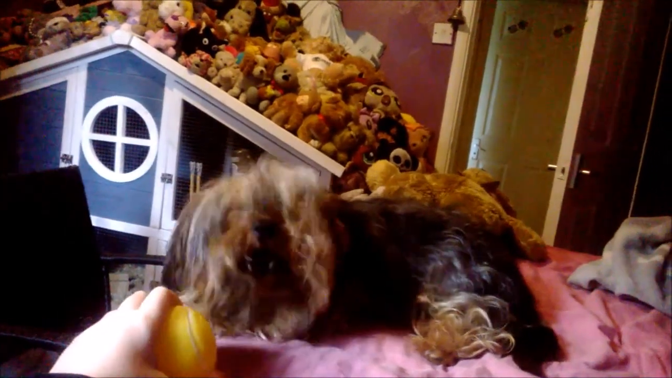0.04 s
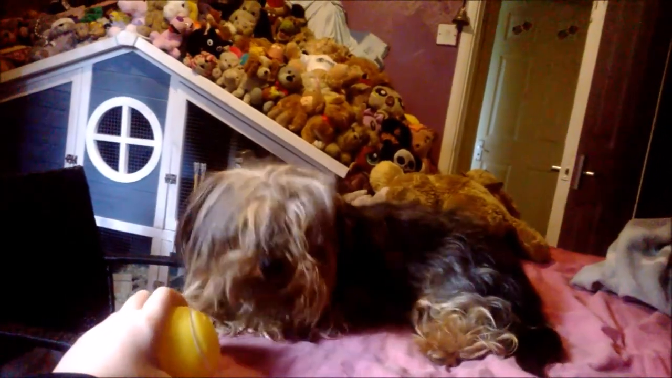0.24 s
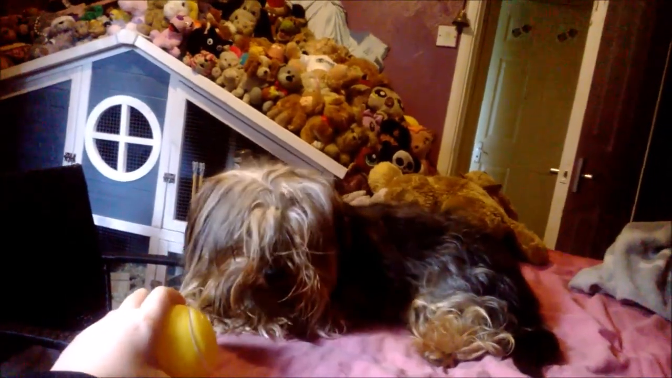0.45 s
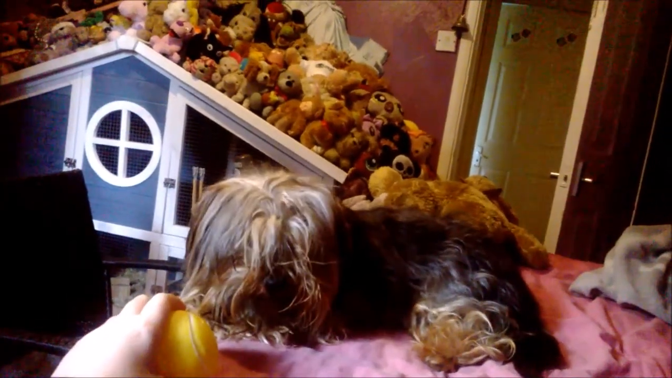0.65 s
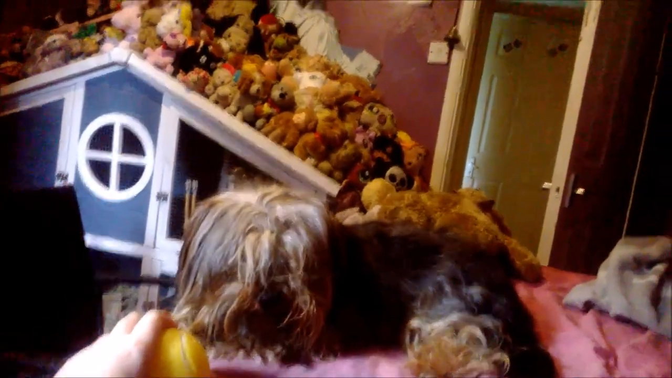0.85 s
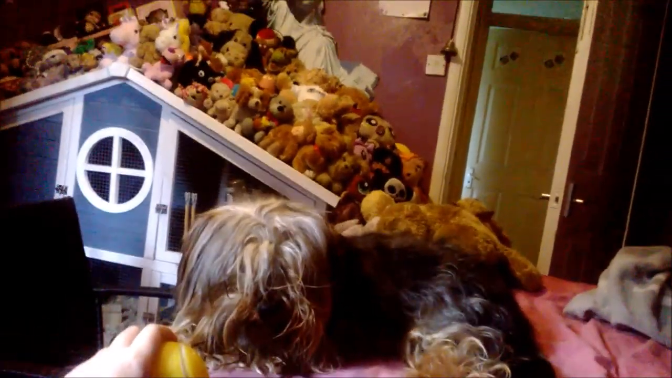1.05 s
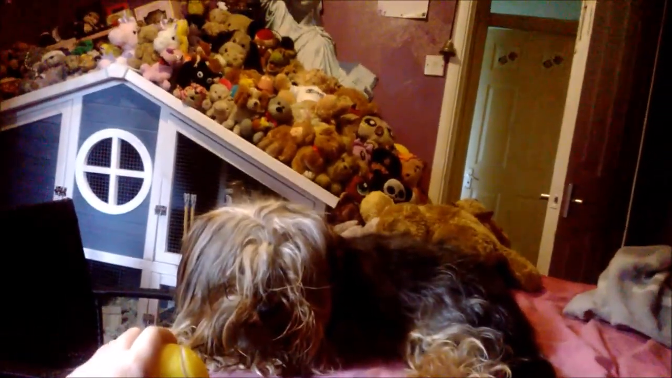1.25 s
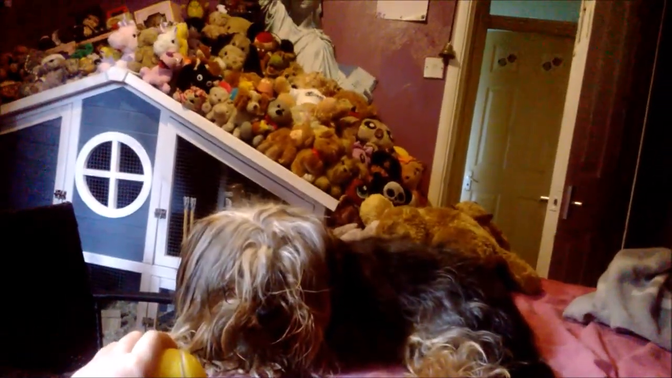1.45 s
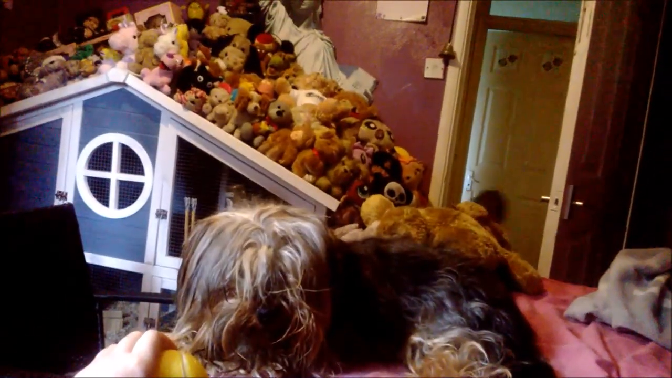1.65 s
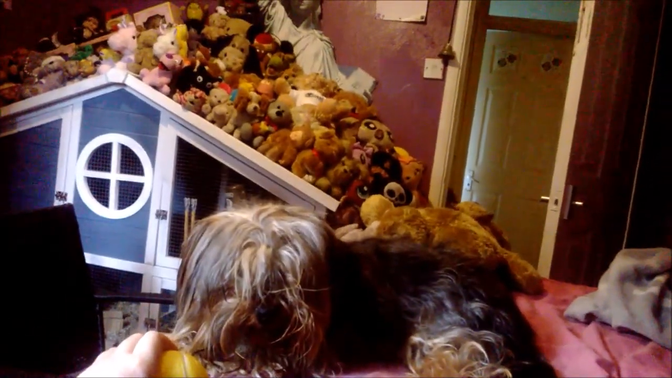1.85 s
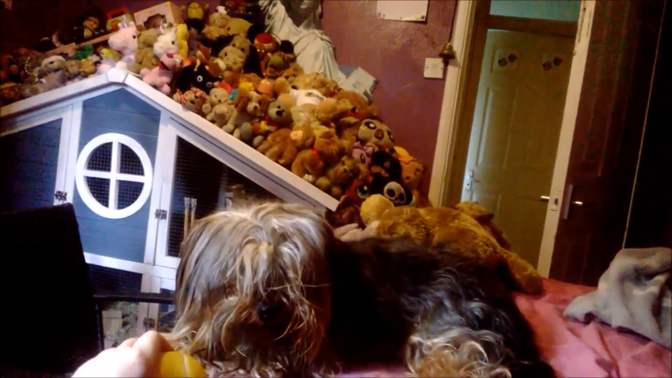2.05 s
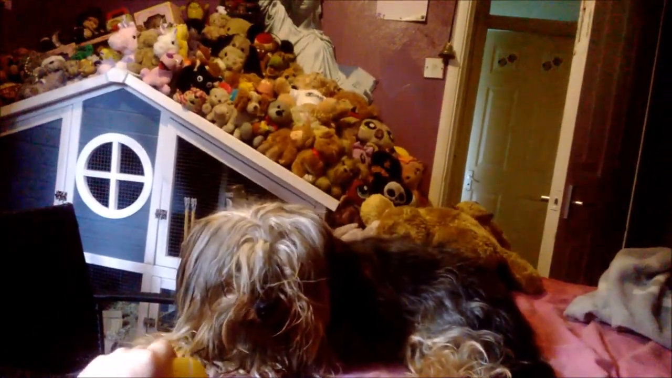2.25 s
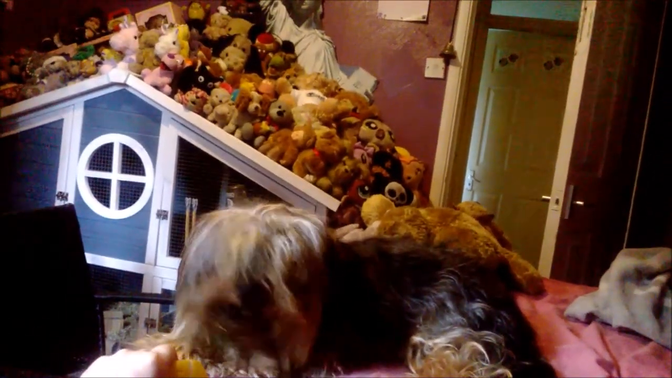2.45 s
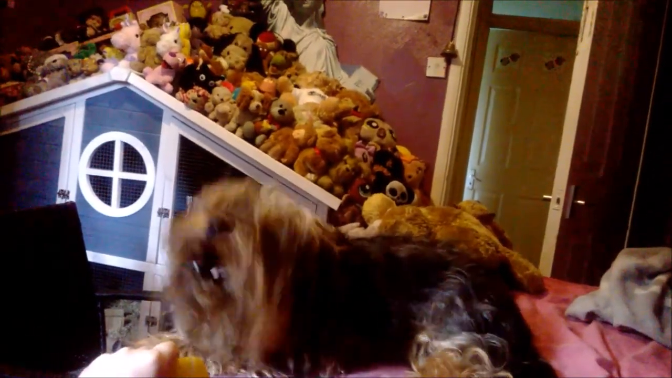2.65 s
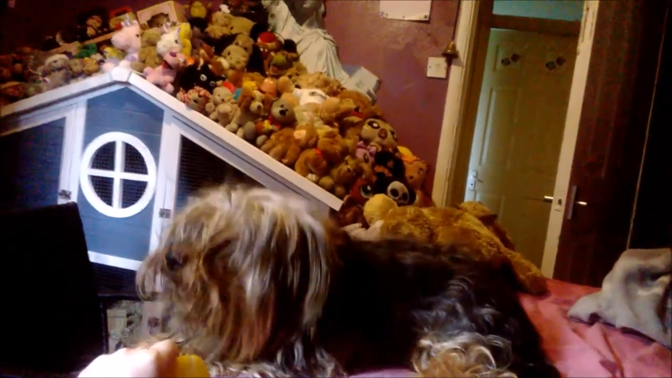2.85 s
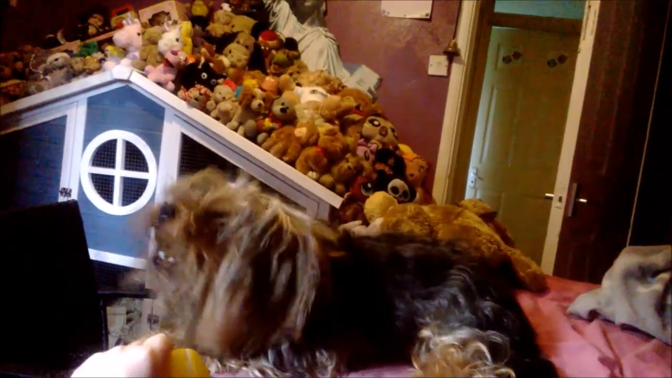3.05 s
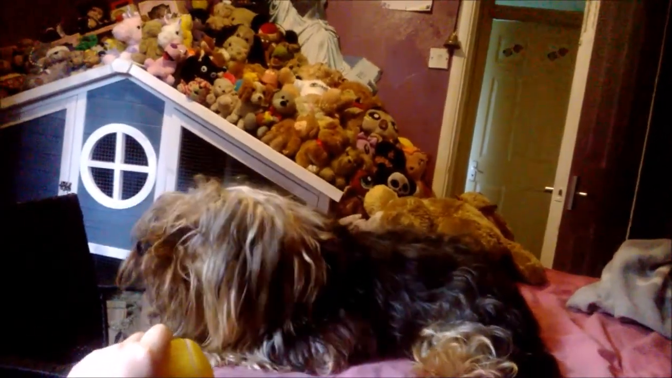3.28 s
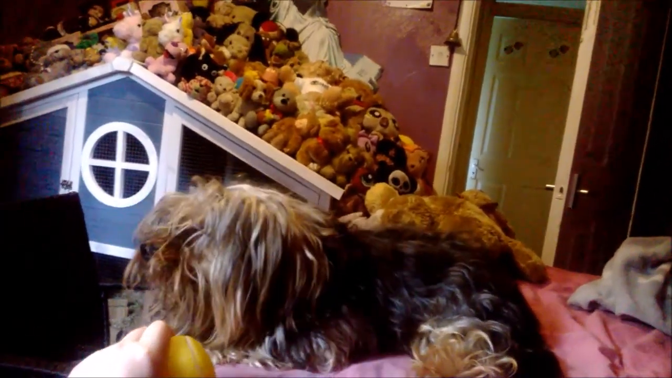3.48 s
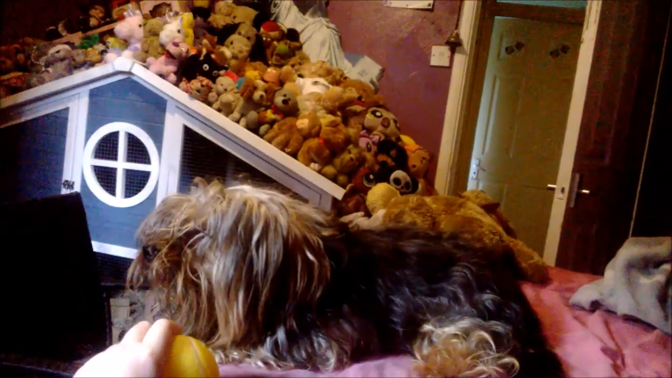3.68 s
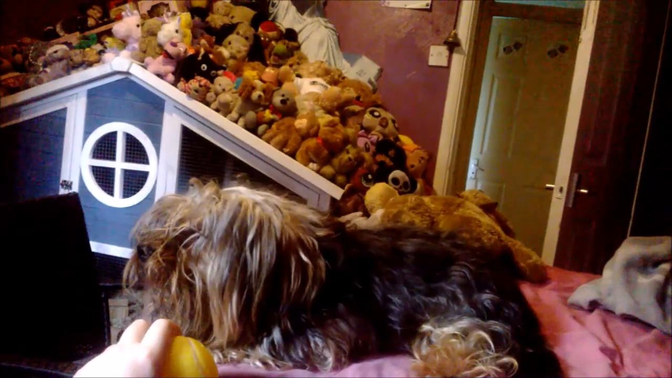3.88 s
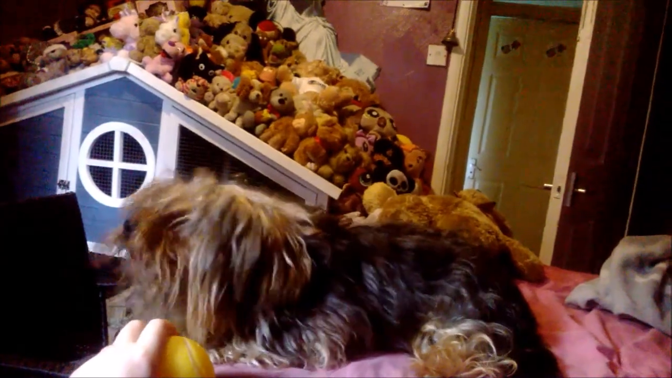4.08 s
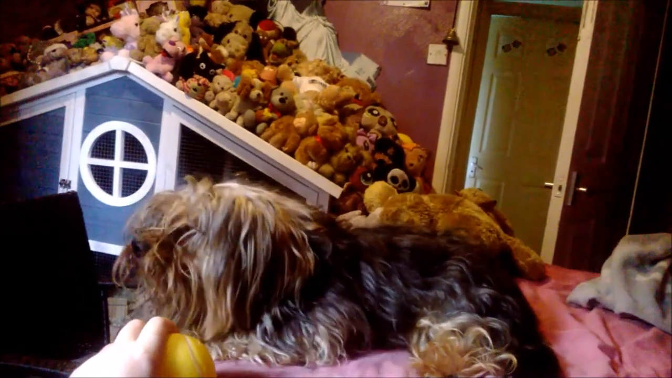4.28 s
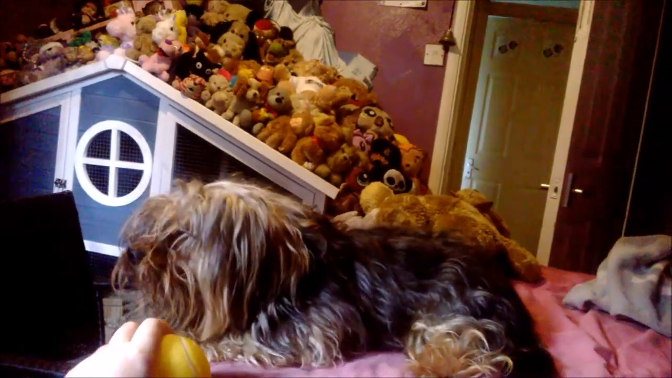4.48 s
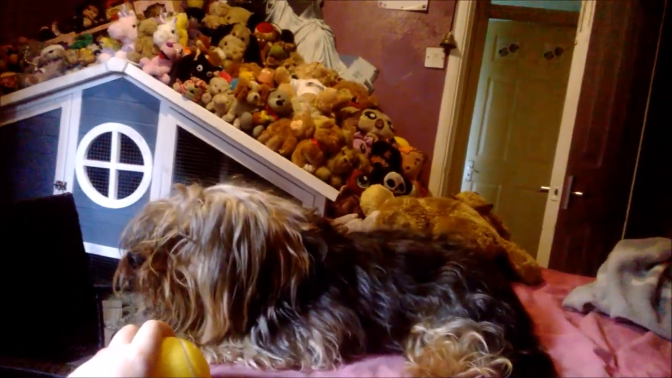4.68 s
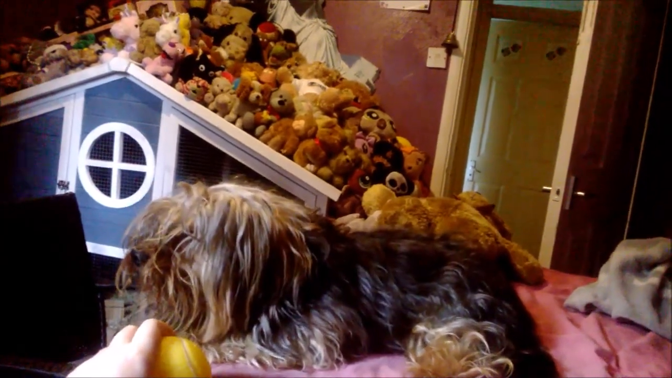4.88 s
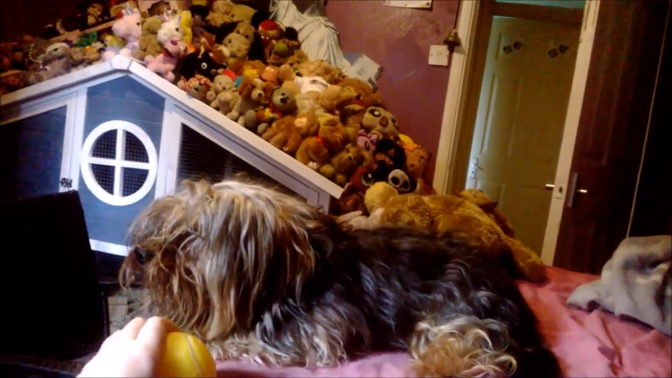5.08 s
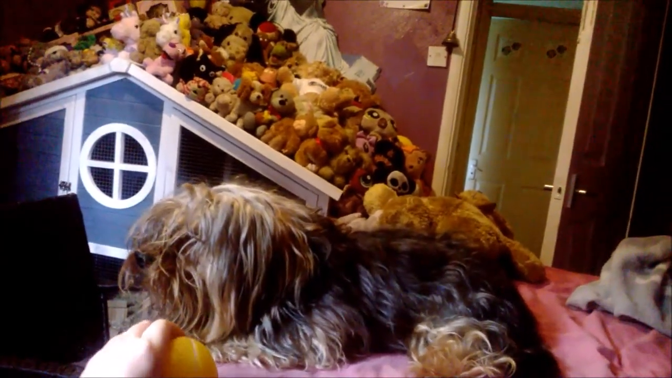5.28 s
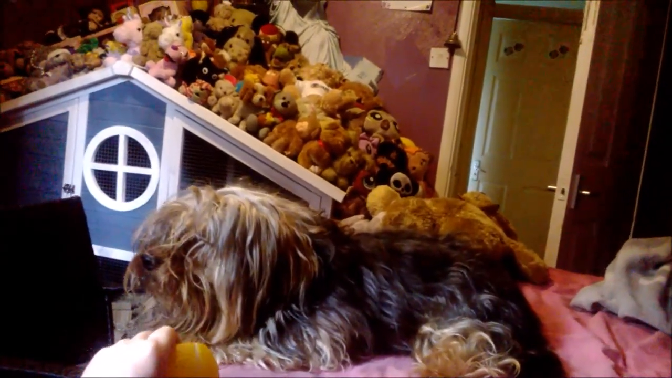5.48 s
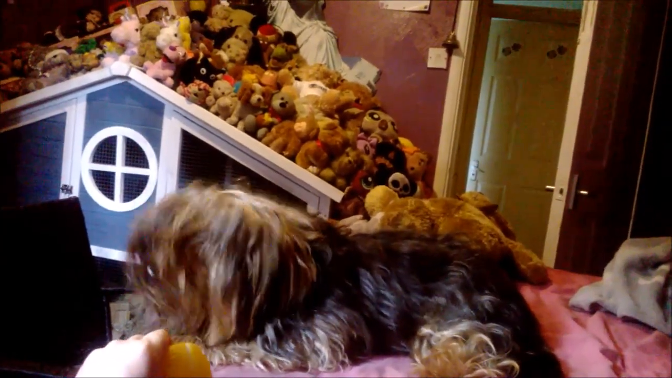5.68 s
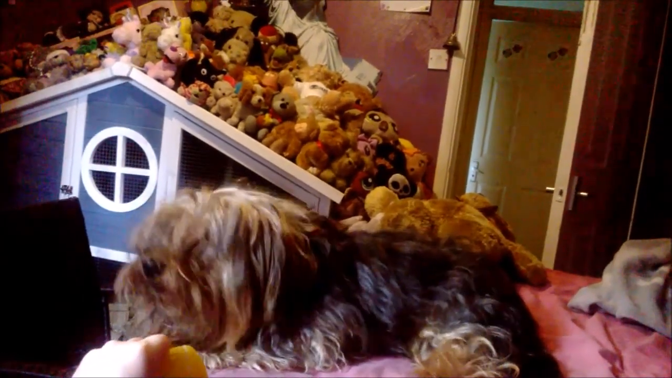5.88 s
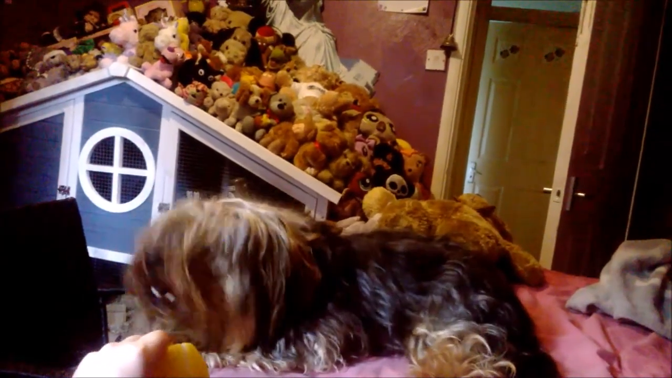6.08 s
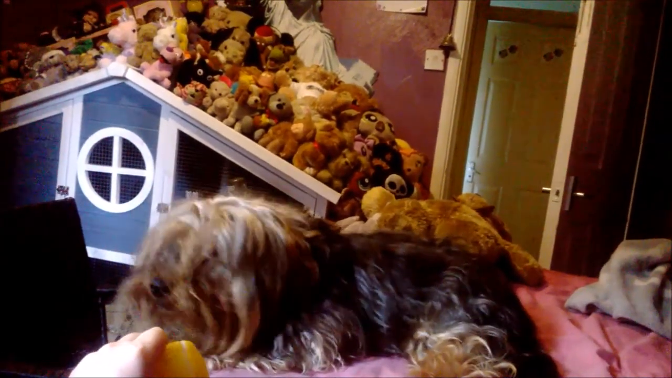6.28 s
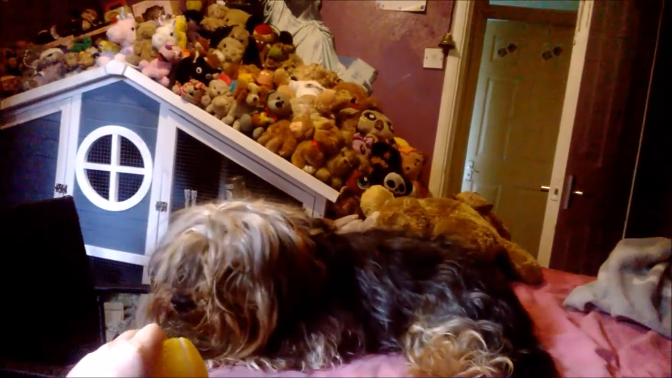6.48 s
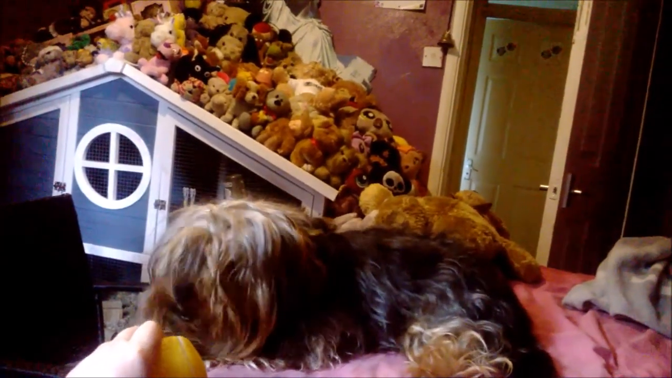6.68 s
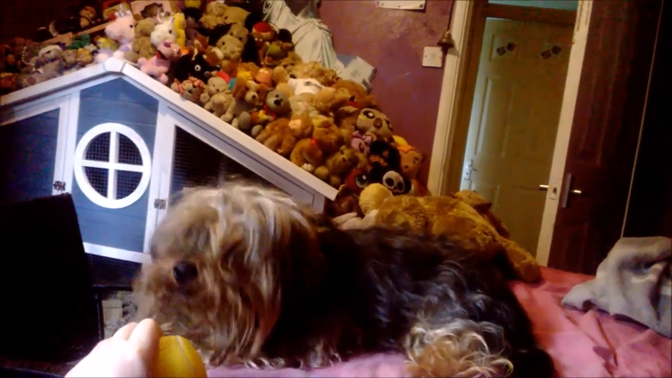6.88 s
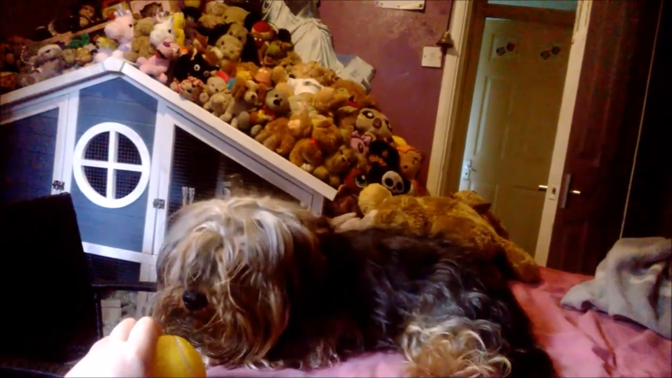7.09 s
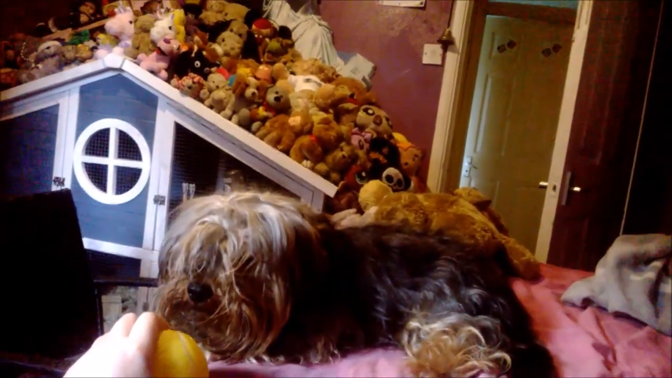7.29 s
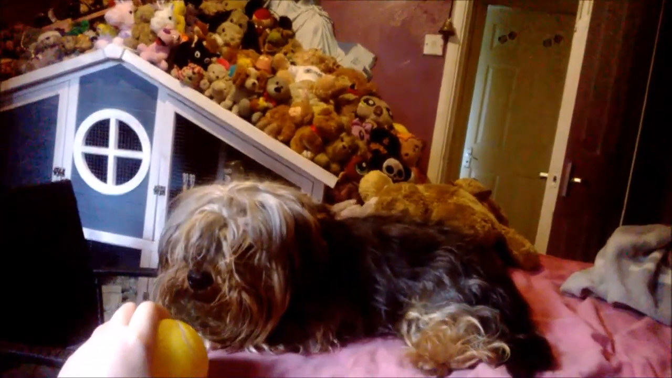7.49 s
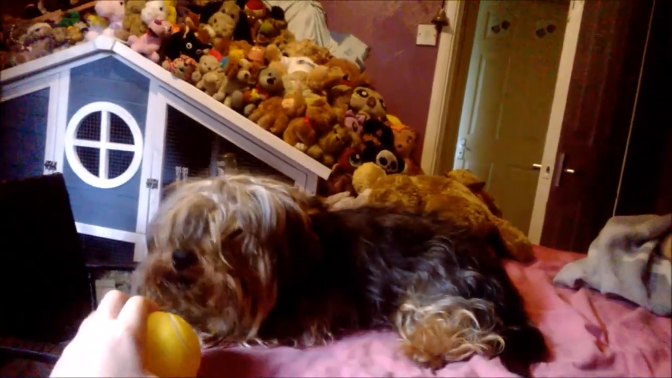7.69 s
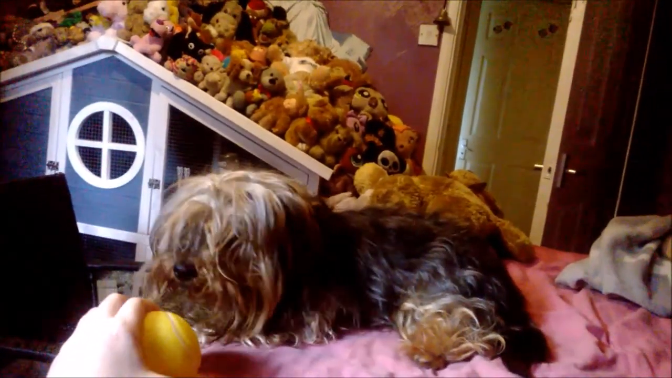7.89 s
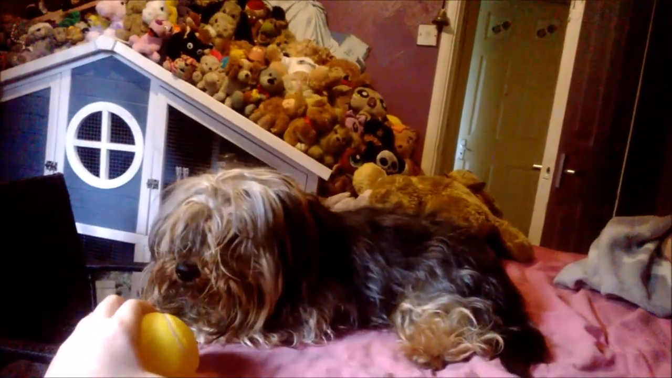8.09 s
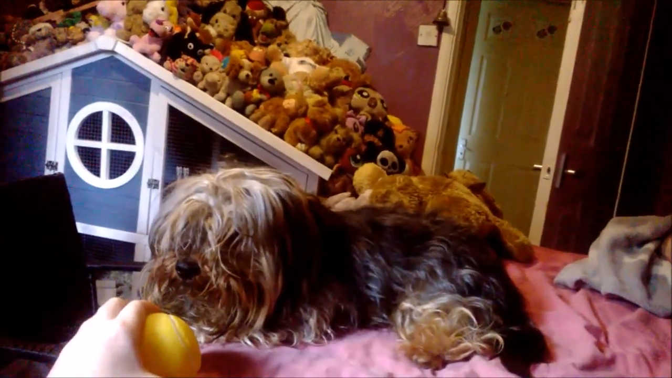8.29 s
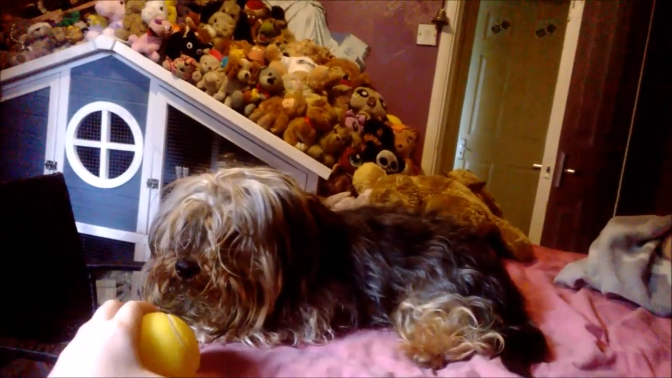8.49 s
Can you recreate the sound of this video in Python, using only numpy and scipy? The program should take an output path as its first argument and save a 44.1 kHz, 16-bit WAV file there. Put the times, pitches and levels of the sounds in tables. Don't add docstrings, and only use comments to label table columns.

```python
import sys
import numpy as np
from scipy import signal
from scipy.fft import rfft, irfft
from scipy.io import wavfile
from scipy.ndimage import uniform_filter1d, minimum_filter1d

SR = 44100
rng = np.random.default_rng(int(sys.argv[2]) if len(sys.argv) > 2 else 0)


def materialize(psi):
    bounded = np.clip(np.atleast_2d(psi).T, -1, 1)
    quanta = np.round(bounded * 32767).astype(np.int16)
    wavfile.write(sys.argv[1], SR, quanta)


def voltage_ratio(decibels):
    exponent = np.asarray(decibels, float) / 20
    return 10 ** exponent


N = 376613


def evened(x):
    return x / np.sqrt(np.mean(x ** 2) + 1e-20)


def read(points, hz):
    f, value = np.transpose(points)
    return np.interp(np.log(hz + 1), np.log(f + 1), value)


def add(mix, s, sound):
    part = mix[round(s * SR):][:len(sound)]
    part += sound[:len(part)]


def controls(rows):
    s, *columns = np.transpose(rows)
    t = np.arange(s[0], s[-1], 1 / SR)
    return s[0], [np.interp(t, s, c) for c in columns]


def coloured(points, size):
    spectrum = rfft(rng.standard_normal(size))
    gain = voltage_ratio(read(points, np.fft.rfftfreq(size, 1 / SR)))
    return evened(irfft(spectrum * gain, size))


def wobble(size, smooth_s):
    span = max(int(smooth_s * SR), 2)
    noise = rng.standard_normal(N // 8)
    slow = evened(uniform_filter1d(uniform_filter1d(noise, span), span))
    return slow[np.arange(size) % (N // 8)]


def resonate(x, hz, width):
    turn = np.exp(2j * np.pi * np.cumsum(hz * np.ones(len(x))) / SR)
    r = np.exp(-np.pi * width / SR)
    return 2 * (turn * signal.lfilter([1 - r], [1, -r], x / turn)).real


# (frequency [Hz], density [dB per Hz])
AIR_NOISE = [(59, -46), (100, 6), (162, -16), (218, -4.5), (438, -23), (1040, -9), (1660, -12),
             (5870, -22.5), (15500, -27)]


def hiss():
    return voltage_ratio(-78) * coloured(AIR_NOISE, N)


# (time [s], level [dB])
STIRRING_LEVEL = [(0, -72), (6.8, -71), (7.0, -76.5), (8.54, -80)]
# (time [s], peak level [dB])
MATTRESS_JOLTS = [(0, -51.5), (.43, -60), (.71, -52), (.96, -42.5), (1.21, -48), (1.501, -38),
                  (1.74, -41.5), (2.369, -35.5), (2.709, -42.5), (2.96, -37), (3.23, -46), (3.46, -36.5),
                  (3.64, -59), (3.83, -58), (4.1, -56.5), (4.6, -53.5), (4.755, -42), (4.95, -59.5),
                  (5.215, -43), (5.77, -37.5), (6.0, -41), (6.26, -57), (6.47, -55), (6.89, -61),
                  (7.71, -73)]
# (frequency [Hz], density [dB per Hz])
SHAKING_SPECTRUM = [(15, -11), (30, -6), (50, -4.5), (90, -5), (130, -16.5), (200, -23), (300, -28),
                    (600, -39.5), (1200, -62.5)]


def rumble():
    rise_db_per_s, fall_db_per_s = 321.5, 150.5
    t = np.arange(N) / SR
    level = voltage_ratio(np.interp(t, *np.transpose(STIRRING_LEVEL)))
    for s, peak_db in MATTRESS_JOLTS:
        slope_db = np.minimum(rise_db_per_s * (t - s), fall_db_per_s * (s - t))
        level = np.maximum(level, voltage_ratio(peak_db + slope_db))
    return level * coloured(SHAKING_SPECTRUM, N)


# (frequency [Hz], t60 [s])
BEDROOM_DECAY = [(300, 0.079), (1500, 0.19), (4000, 0.2), (10000, 0.18)]


def room(x):
    taps = np.zeros(SR // 2)
    at = np.arange(150, SR // 2 - 20, 20)
    taps[at + rng.integers(0, 20, at.shape)] = rng.choice([-1., 1.], at.shape)
    hz, t, z = signal.stft(taps, SR, nperseg=256)
    decay = voltage_ratio(-60 * t / read(BEDROOM_DECAY, hz)[:, None])
    tail = signal.istft(z * decay, SR, nperseg=256)[1]
    return signal.fftconvolve(x, tail / np.linalg.norm(tail))[:N]


# (frequency [Hz], density [dB per Hz])
CLOTH_RUSTLE = [(290, -19.5), (500, 1.5), (763, -12), (1720, -6.5), (2530, -4.5), (3720, -11), (4680, -22),
                (9000, -28.5), (11700, -55.5), (19800, -120)]


def thump(s, peak_db, hz, rustle_db, t60):
    t = np.arange(SR // 2) / SR
    knock = coloured([(90, -23.0), (160, -3.5), (290, 3.5), (500, -19.5), (900, -15.0),
                      (2000, -51), (7000, -86.5)], len(t))
    rustle = voltage_ratio(rustle_db) * coloured(CLOTH_RUSTLE, len(t))
    swell = (1 - np.exp(-t / 0.0063)) * voltage_ratio(-60 * t / t60)
    late_swell = np.roll(swell, 300) ** 0.87
    hollow = 1.5 * np.sin(2 * np.pi * hz * t) * np.sin(np.pi * np.minimum(t / 0.039, 1)) ** 2
    return s, voltage_ratio(peak_db - 11.5) * (hollow + swell * knock + late_swell * rustle)


# (time [s], peak level [dB], hollow [Hz], rustle above 600 Hz, relative [dB], t60 [s])
BEDDING_BLOWS = [(0.697, -48.5, 151, -22.5, 0.23), (0.935, -46.5, 172, -28.5, 0.18),
                 (1.194, -41.5, 281, -6, 0.23), (1.445, -17, 304, -14, 0.24),
                 (1.716, -21.5, 308, 1.5, 0.23), (2.3, -72, 220, 32, 0.2), (3.42, -35, 142, -18, 0.31),
                 (4.247, -42, 293, 2.5, 0.3), (4.551, -43, 385, -32, 0.38), (4.698, -50, 163.2, -27, 0.22),
                 (5.159, -57, 194, -23.5, 0.15), (8.029, -60, 270, -6.5, 0.2)]


def bedding():
    out = np.zeros(N)
    for row in BEDDING_BLOWS:
        add(out, *thump(*row))
    return out


# (frequency [Hz], gain [dB])
TUBE_OUT = [(900, 1), (1400, -4), (2700, -5.5), (4100, -5), (5400, -3), (6800, 3), (8200, -7), (9600, -7),
            (11000, -15.5), (13000, -35), (15500, -32.5)]
# (frequency [Hz], gain [dB])
TUBE_IN = [(900, 4.5), (1400, 0), (2700, -3), (4100, -5.5), (5400, -13.5), (6800, 1.5), (8200, -3.5),
           (9600, -4.5), (11000, -21), (13000, -30), (15500, -35.5)]


def squeak(rows, low_db, tube):
    s, (hz, level_db) = controls(rows)
    n = len(hz)
    flutter_db = 2 * wobble(n, 0.016)
    level_db, low_db = level_db + flutter_db, low_db - flutter_db
    hz = uniform_filter1d(hz, 300)
    angle = 2 * np.pi * np.cumsum(hz * (1 + 0.0024 * wobble(n, 0.0035))) / SR

    k = np.arange(1, 17)[:, None]
    low_share = np.clip((6000 - k * hz) / 2000, 0, 1)
    gains = voltage_ratio(read(tube, k * hz) + low_db * low_share) * (k * hz < 16000)
    in_upper_band = (k * hz > 5800) * (k * hz < 11000)
    upper = np.sqrt((gains ** 2 * in_upper_band).sum(0) / 2)
    dips_db = 1.41 * wobble(N // 8, .02)[(np.arange(n) + 2900 * k) % (N // 8)]
    partials = voltage_ratio(dips_db) * gains * np.sin(k * angle + 0.2 * k ** 2)
    reed = partials.sum(0) / uniform_filter1d(upper, 400)

    glide = abs(np.gradient(np.log(hz))) * SR
    air = voltage_ratio(np.minimum(-42 + 5.9 * glide, -6)) * coloured([(400, -21.5)] + tube[1:], n)
    rise_samples = 700 if tube is TUBE_IN and s > 0 else 130
    rise = np.minimum(np.arange(n) / rise_samples, 1)
    fall = np.minimum(np.arange(n)[::-1] / 150, 1)
    return s, voltage_ratio(level_db - 3.0) * (reed + air) * rise * fall


def refill_shape(rows):
    (s, hz, db), (end, end_hz, end_db) = rows[0], rows[-1]
    catch_s, flick_s, stall_s = .008, 0.028, .044
    catch = [(s - catch_s, hz * .955, db - 7)] if s > catch_s else []
    flick = (end + flick_s, end_hz * 1.015, end_db + 5)
    stall = (end + flick_s + stall_s, end_hz * .9, end_db - 20)
    return catch + rows + [flick, stall]


# (time [s], reed pitch [Hz], squeeze level [dB])
SQUEALS = [
    [(2.15, 1002, -43), (2.163, 1105, -25.5), (2.188, 1212, -19.5), (2.26, 1316, -14.5),
     (2.345, 1320, -14.5), (2.405, 1255, -16), (2.47, 1226, -19), (2.548, 1073, -24), (2.6, 879.5, -54.5)],
    [(5.361, 1086, -32.5), (5.379, 1228, -19), (5.399, 1355, -13), (5.445, 1536, -10.5), (5.458, 1524, -9)],
    [(5.455, 2116, -13.5), (5.468, 2780, -20), (5.475, 3221, -30.5)],
    [(5.468, 3887, -18.5), (5.51, 4147, -20), (5.604, 4087, -18.5), (5.704, 3836, -19.5),
     (5.728, 3616, -16), (5.78, 3462, -19.5)],
]
SQUEAL_LOWS = [0.5, 1.1, 6, 1.7]
# (time [s], reed pitch [Hz], flow level [dB])
GRIP_RELEASE = [(5.778, 3406, -28), (5.784, 2007, -10.5), (5.8, 1930, -29.5), (5.806, 1379, -19),
                (5.855, 1317, -26.5), (5.866, 1196, -28.5), (5.91, 1002, -30.5), (5.95, 899, -49.5)]
# (time [s], reed pitch [Hz], flow level [dB])
WHINES = [
    [(0, 1392, -22.5), (.092, 1349, -27), (.2, 1389, -28.5)],
    [(3.013, 1319, -32), (3.139, 1340, -26), (3.329, 1355, -30), (3.431, 1349, -28), (3.545, 1323, -33),
     (3.739, 1366, -25), (3.8, 1370, -27)],
    [(6.123, 1348, -29.5), (6.163, 1410, -22), (6.221, 1429, -27.5), (6.311, 1422, -25.5),
     (6.47, 1382, -26), (6.575, 1364, -30), (6.79, 1358, -32)],
    [(7.094, 1321, -38), (7.17, 1346, -31), (7.2, 1374, -32.5)],
]
WHINE_LOWS = [-3, -2.5, -3.5, 1]


def ball():
    out = np.zeros(N)
    for rows, low_db in zip(SQUEALS, SQUEAL_LOWS):
        add(out, *squeak(rows, low_db, TUBE_OUT))
    add(out, *squeak(GRIP_RELEASE, 1, TUBE_IN))
    for rows, low_db in zip(WHINES, WHINE_LOWS):
        add(out, *squeak(refill_shape(rows), low_db, TUBE_IN))
    return out


def growl_shape(opens, effort_db, swell, hold, gain_db):
    silent_db, release_s = -72, .024
    held_db = effort_db + gain_db
    return [(opens - (effort_db - silent_db) / swell, silent_db, 2),
            (opens, effort_db, -8),
            (opens + hold, held_db, 3),
            (opens + hold + release_s, held_db - 26, 9)]


# (frequency [Hz], width [Hz], gain [dB])
THROAT_RESONANCES = [(930, 135, 4.5), (1690, 310, 0.5), (2120, 94, -12), (2569, 390, -4), (3650, 470, -19),
                     (4084, 150, -11.5), (4730, 400, -42.5), (9720, 1200, -21.5)]


def growl(rows):
    s, (effort_db, bright_db) = controls(rows)
    n = len(effort_db)
    reached_db = np.maximum.accumulate(effort_db)
    chaos = np.clip((reached_db + 19) / 7, .06, .9)
    hz = 490 * 2 ** np.clip((reached_db + 13.5) / 17, -2.1, 0)
    turns = np.cumsum(hz * (1 + .3 * chaos * wobble(n, .002))) / SR
    pulses = np.diff(np.floor(turns), prepend=0) * np.sqrt(SR / hz)
    pulses = pulses * voltage_ratio(4.5 * chaos * wobble(n, .002))
    puffs = evened((0.75 + np.exp(-(turns % 1) / 0.043)) * rng.standard_normal(n))
    drive = (1 - 0.086 * chaos) * pulses + 1.6 * chaos * puffs

    sharp_db = bright_db + 0.55 * np.minimum(reached_db + 13, 0)
    jaw = 1 + 0.025 * np.clip(reached_db + 12.5, -15, 0)
    voice = np.zeros(n)
    for k, (f, width, db) in enumerate(THROAT_RESONANCES):
        centre = f * jaw if k == 0 else f
        treble_db = sharp_db if k > 0 else 0
        level = voltage_ratio(db + treble_db + 4.0 * wobble(n, 0.006)) / np.sqrt(width)
        once = resonate(drive, centre, 1.5 * width)
        voice += (-1) ** k * level * resonate(once, centre, 1.5 * width)
    voice = signal.sosfilt(signal.butter(4, 11000, fs=SR, output="sos"), voice)
    low = signal.sosfilt(signal.butter(2, [450, 1250], "band", fs=SR, output="sos"), voice)
    clear = 0.5 * np.sin(2 * np.pi * turns) + 0.27 * np.sin(4 * np.pi * turns)
    chest = (1 - chaos) * clear
    return s, voltage_ratio(effort_db - 0.5) * (voice / np.std(low) + chest) * signal.windows.tukey(n, .15)


def whistle_shape(opens, times, pitches, efforts):
    top, middle, low, breaks, end = times
    top_hz, middle_hz, low_hz = pitches
    high_db, middle_db, low_db, fall_db = efforts
    climb_hz, high_step_hz = 1336, 2530
    sag, jump_s, dip_db = .035, .006, -9
    fall = end - breaks
    return [(opens, climb_hz, -31),
            ((opens + top) / 2, np.sqrt(climb_hz * top_hz), -16),
            (top, top_hz, -14),
            ((top + middle) / 2, min(top_hz, high_step_hz), high_db),
            (middle - jump_s / 2, middle_hz * (1 + sag), min(high_db, middle_db) + dip_db / 2),
            (middle, middle_hz, middle_db),
            (low - jump_s, middle_hz * (1 - sag), middle_db - 3.0),
            (low - jump_s / 2, (middle_hz + low_hz) / 2, middle_db + dip_db),
            (low, low_hz * (1 + sag / 2), low_db),
            (breaks, low_hz * (1 - sag / 2), low_db - 2.0),
            (breaks + .26 * fall, 930, fall_db - 12.5),
            (breaks + .46 * fall, 715, fall_db),
            (end, 530, fall_db - 22)]


def grunt_shape(s, length, hz, effort_db, sag):
    return [(s, hz, effort_db - 8.5),
            (s + .42 * length, hz * (1 - .62 * sag), effort_db),
            (s + length, hz * (1 - sag), effort_db - 11)]


OVERTONE_LEVELS = [-10, -15.5, -25.5, -31]
# (frequency [Hz], gain [dB])
THROAT_EXIT = [(500, -2), (1700, -4), (2300, -4), (3000, -18.5), (3450, -6.5), (3800, -6), (4250, 1),
               (4700, -6.5), (5200, -18.5), (5700, -33.5)]


def whistle(rows, hoarse):
    s, (hz, effort_db) = controls(rows)
    n = len(hz)
    before_top = 1. * (np.arange(n) < np.argmax(hz)) * (hz.max() > 1500)
    climbing = uniform_filter1d(before_top, size=400)
    rough = np.clip(np.maximum(0.66 * climbing, hoarse + (hz - 2200) / 900), hoarse, .9)
    angle = 2 * np.pi * np.cumsum(hz * (1 + 0.0086 * wobble(n, 0.006))) / SR
    chance = (wobble(n, 0.0027) + 1j * wobble(n, 0.0024)) / np.sqrt(2)
    shake = (1 - rough + rough * chance) / np.hypot(1 - rough, rough)
    overtones = np.zeros(n)
    for k, db in enumerate(OVERTONE_LEVELS, start=2):
        overtones += voltage_ratio(db + read(THROAT_EXIT, k * hz)) * (shake * np.exp(1j * k * angle)).imag
    tone = (shake * np.exp(1j * angle)).imag + (1 - rough) * overtones
    return s, voltage_ratio(effort_db) * tone * signal.windows.tukey(n, .05)


# (frequency [Hz], width [Hz], level [dB])
HOLLOWS = [(786, 18, -6), (1665, 18, -3), (1757, 11, -3), (2097, 14, -5), (2540, 22, -5), (4160, 20, -1)]


def ringing_hollows(x):
    return sum(voltage_ratio(db) * resonate(x, hz, width) for hz, width, db in HOLLOWS)


# (mouth open [s], effort [dB], swell [dB per s], hold [s], gain over the hold [dB])
YAP_GROWLS = [
    (0.103, -9, 1050, 0.046, 2.5),
    (2.734, -11.5, 999.5, .075, -1.5),
    (3.131, -12, 1130.5, .025, 3),
    (4.039, -14.5, 840.5, .052, 2),
    (5.776, -12.5, 1400.5, .06, 0),
    (6.17, -10, 1070, .042, -1.3),
    (6.793, -9.5, 1049.5, .037, 0.3),
    (7.746, -17.5, 559, 0.048, -9),
]
# (top [s], middle step [s], low step [s], break [s], end [s])
YAP_TIMES = [(.158, .178, .2, .218, .285), (2.755, 2.82, 2.836, 2.85, 2.895),
             (3.136, 3.181, 3.213, 3.241, 3.297), (4.095, 4.117, 4.139, 4.165, 4.24),
             (5.835, 5.866, 5.882, 5.892, 5.93), (6.211, 6.222, 6.251, 6.272, 6.325),
             (6.843, 6.861, 6.884, 6.905, 6.975)]
# (top [Hz], middle step [Hz], low step [Hz], least roughness [0-1])
YAP_PITCHES = [(2634, 2220, 1745, 0), (2800, 2250, 1670, .25), (3101, 2115, 1670, .12),
               (2550, 2230, 1680, .14), (2600, 2220, 1670, .24), (2080, 2130, 1675, .09),
               (2560, 2185, 1660, .1)]
# (high [dB], middle [dB], low [dB], fall [dB])
YAP_EFFORTS = [(-9, -4.5, -5.5, -18), (-7, -6, -6.5, -16.5), (-12.5, -9.5, -7.5, -23),
               (-0.5, -7, -9.5, -21.5), (-9, -6, -9, -19.5), (-6, -7.5, -5, -22.5), (-3, -5.5, -8, -22.5)]
# (time [s], pitch [Hz], effort [dB])
SOFT_YAP = [(7.73, 620, -34), (7.755, 800, -18), (7.77, 940, -13), (7.797, 1020, -14), (7.815, 810, -17),
            (7.83, 685, -14), (7.845, 610, -38)]
# (start [s], length [s], pitch [Hz], effort [dB], pitch sag [share])
SHUTTING_GRUNTS = [(.275, 0.064, 378, -47.5, 0.056), (3.3, .06, 388.7, -58, .09),
                   (4.24, .06, 285.3, -46.5, 0.081), (4.3, .055, 262, -51.5, .01),
                   (4.355, .035, 267.5, -53, 0.032), (4.39, .04, 247.2, -50.5, .06),
                   (6.97, 0.063, 370, -51, 0.16), (7.84, 0.054, 332, -44, 0.29)]


def dog():
    out = np.zeros(N)
    for row in YAP_GROWLS:
        add(out, *growl(growl_shape(*row)))
    for yap, times, (*pitches, hoarse), efforts in zip(YAP_GROWLS, YAP_TIMES, YAP_PITCHES, YAP_EFFORTS):
        add(out, *whistle(whistle_shape(yap[0], times, pitches, efforts), hoarse))
    add(out, *whistle(SOFT_YAP, .05))
    for row in SHUTTING_GRUNTS:
        add(out, *whistle(grunt_shape(*row), 0.23))
    return out + ringing_hollows(out)


def scene():
    thumps, toy, yaps = bedding(), ball(), dog()
    wet = room(voltage_ratio(-7) * yaps + voltage_ratio(-8) * toy + voltage_ratio(-14.5) * thumps)
    return (yaps + toy + thumps + wet + rumble() + hiss())[None]


def band_limit(x):
    return signal.sosfilt(signal.butter(12, 15680, fs=SR, output="sos"), x)


def record(dry):
    ceiling = .97
    gain = minimum_filter1d(ceiling / np.maximum(abs(dry), ceiling), size=441)
    mix = dry * uniform_filter1d(gain, size=301)
    return band_limit(mix)


dry = scene()
out = record(dry)
materialize(out)
```